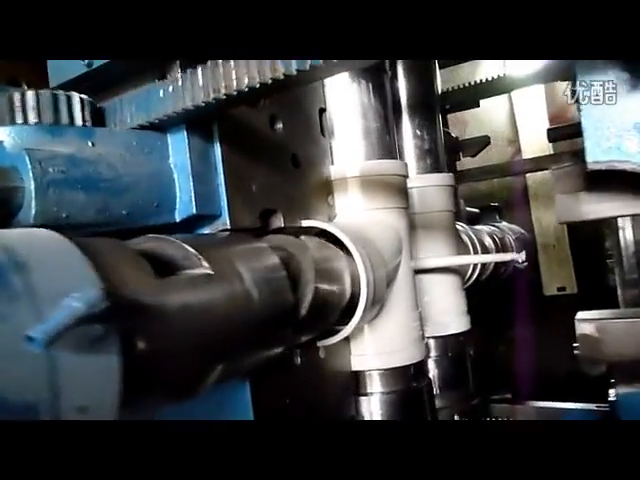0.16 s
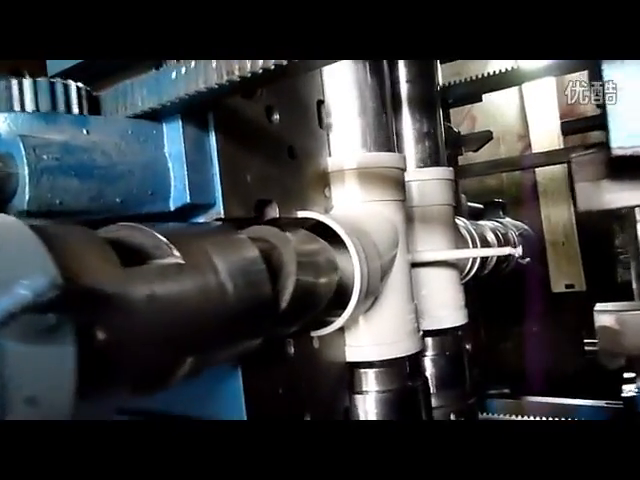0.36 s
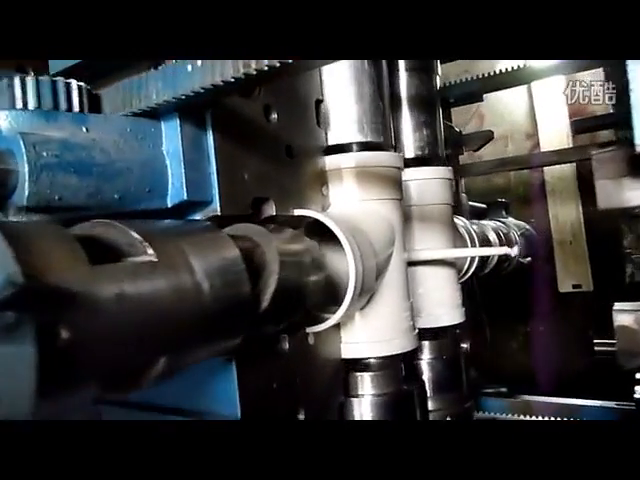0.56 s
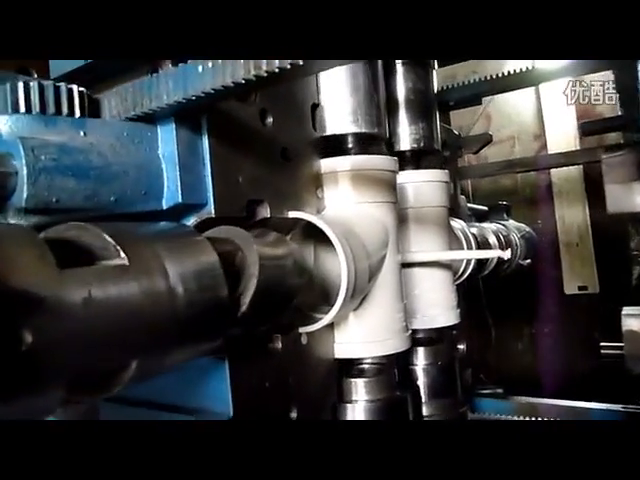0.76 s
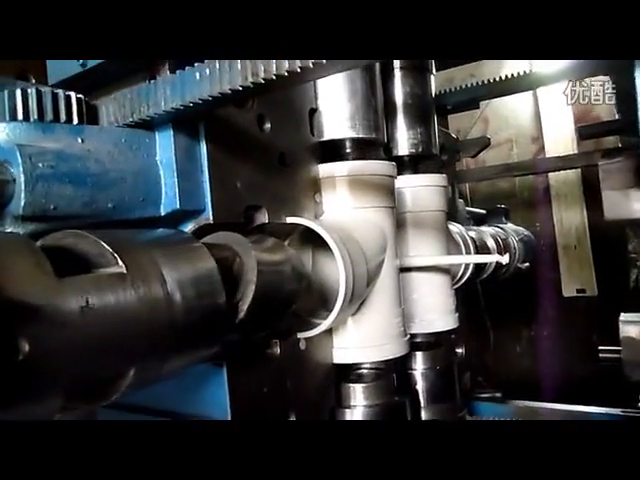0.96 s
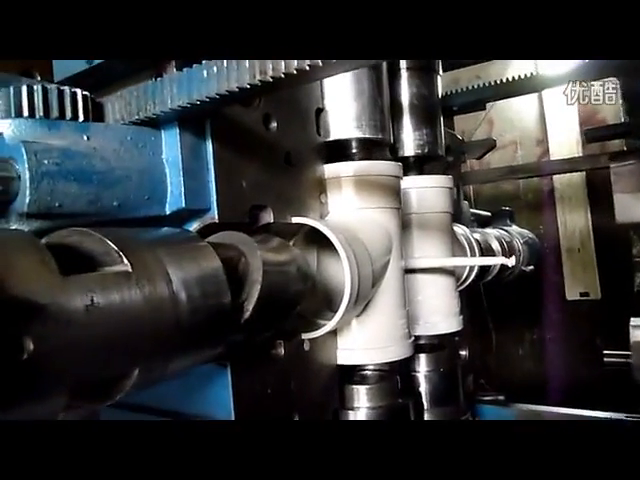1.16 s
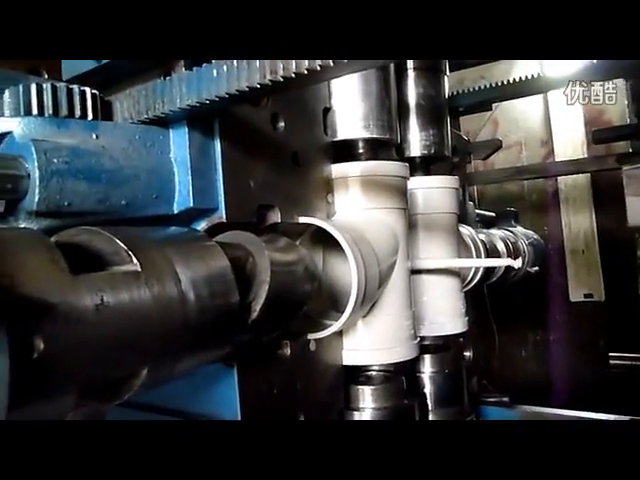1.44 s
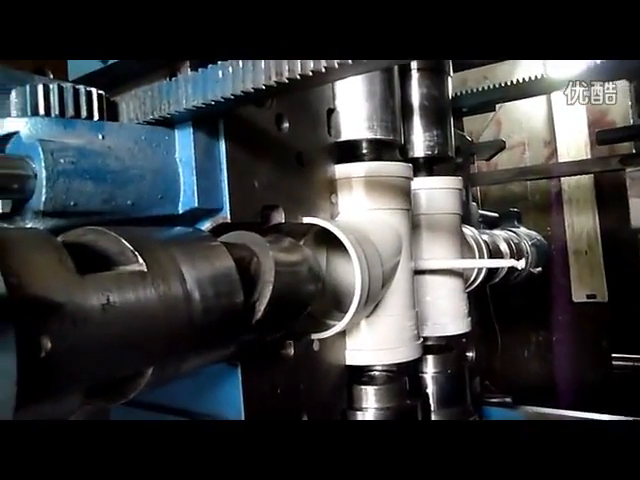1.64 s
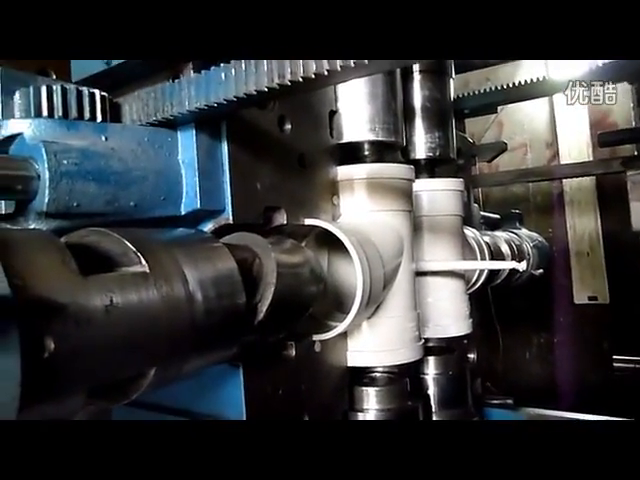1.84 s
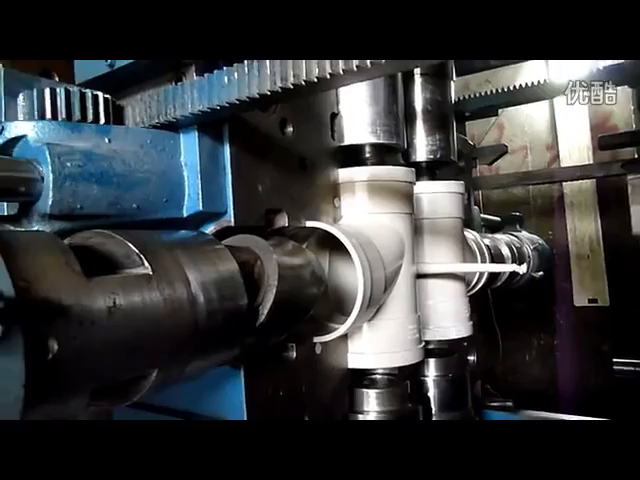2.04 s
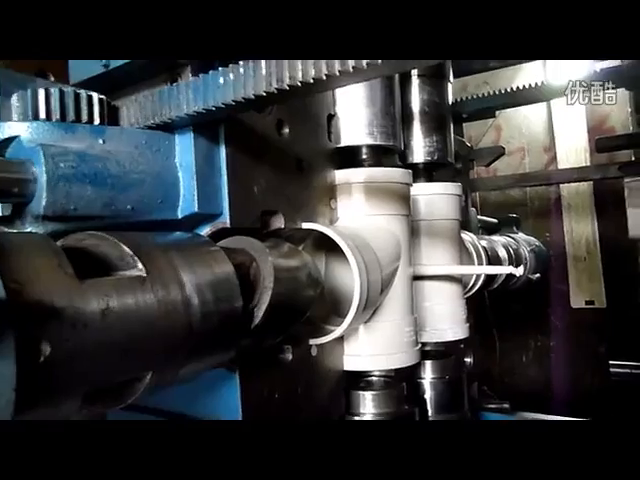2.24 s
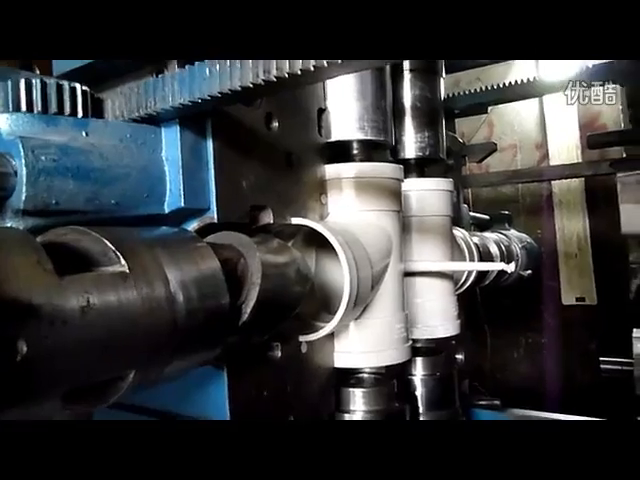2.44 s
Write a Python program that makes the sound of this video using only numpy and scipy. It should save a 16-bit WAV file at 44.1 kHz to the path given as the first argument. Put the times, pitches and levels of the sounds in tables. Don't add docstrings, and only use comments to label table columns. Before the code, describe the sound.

A moulding machine drones loudly and close in a busy factory hall, its steady pump whine near 300 Hz under bright oil hiss. At 0.84 s a hard steel clack cuts the hiss. From 1.0 s a slide rumbles with small knocks until about 1.6 s, while thin, whistling air hisses. At 2.1 s oil hiss surges back, with a sharp air spit at 2.3 s. Dense mono camera sound.

```python
import sys
import numpy as np
from scipy import signal
from scipy.fft import rfft, irfft
from scipy.io import wavfile
from scipy.ndimage import uniform_filter1d

SR = 44100
rng = np.random.default_rng(int(sys.argv[2]) if len(sys.argv) > 2 else 0)


def gain_from_db(level_db):
    decades = np.asarray(level_db, float) / 20
    return 10 ** decades


def to_wav(s):
    ch = np.atleast_2d(s).T
    pcm = np.round(np.clip(ch, -1, 1) * 32767)
    wavfile.write(sys.argv[1], SR, pcm.astype(np.int16))


N = 113778


def curve(rows):
    seconds, value = np.transpose(np.array(rows, float))
    return np.interp(np.arange(N) / SR, seconds, value)


def walk(rate_hz):
    hold = max(int(SR / rate_hz), 2)
    steps = np.repeat(rng.standard_normal(N // hold + 2), hold)
    wander = uniform_filter1d(uniform_filter1d(steps, hold), hold)[:N]
    return (wander - wander.mean()) / wander.std()


def roar(spectrum, swell_db, flick_db, flick_hz, body=()):
    hz, db = np.transpose(np.array(spectrum, float))
    f = np.fft.rfftfreq(N, 1 / SR) + 1
    level_db = np.interp(np.log(f), np.log(hz), db, left=-60)
    for peak_hz, width_hz, peak_db in body:
        level_db = level_db + peak_db / (1 + ((f - peak_hz) / width_hz * 2) ** 2)
    shaped = gain_from_db(level_db) * rfft(rng.standard_normal(N))
    noise, swell = 0, walk(3.03)
    for octave in np.arange(4.5, 14, 1 / 3):
        share = np.clip(1 - 3 * np.abs(np.log2(f) - octave), 0, 1)
        if (np.abs(shaped) * share).max() > np.abs(shaped).max() / 300:
            band = irfft(shaped * share, N)
            noise = noise + band * gain_from_db(swell_db * swell + flick_db * walk(flick_hz))
    return noise / noise.std()


def tone(phase, rms_db, walk_db, walk_hz):
    level = np.sqrt(2) * gain_from_db(rms_db + walk_db * walk(walk_hz))
    return level * np.sin(phase + 2 * np.pi * rng.random())


def lines(table, walk_db, walk_hz):
    t = np.arange(N) / SR
    return sum(tone(2 * np.pi * hz * t, db, walk_db, walk_hz) for hz, db in table)


def ring(start, hz, peak_db, t60):
    contact_s = 0.00041
    t = np.clip(np.arange(N) / SR - start, 0, None)
    envelope = gain_from_db(peak_db - 60 * t / t60) * (1 - np.exp(-t / contact_s))
    return envelope * np.sin(2 * np.pi * hz * t)


# rms level idle in dB, rms level loaded in dB.
VANE_HARMONICS = [(-30.5, -30.5), (-31.5, -31), (-46.5, -44.5), (-44, -46), (-44.5, -72), (-59, -52),
                  (-46, -47.5), (-44.5, -43), (-56, -49), (-60, -60), (-54, -58), (-67, -45),
                  (-40.5, -46.5), (-51, -47), (-51, -50), (-53.5, -51), (-48.5, -52), (-56, -60),
                  (-53, -43.5), (-47, -44.5), (-45, -49), (-55, -50), (-59, -45.5), (-47, -47), (-45, -50),
                  (-45, -47), (-61, -65), (-56, -62), (-46, -44), (-53, -58), (-54, -51), (-58, -48),
                  (-56, -49)]
# time in seconds, load as a share 0-1.
PUMP_LOAD = [
    (0, 0.98),
    (.86, 1),
    (.93, .4),
    (1.08, 0.01),
    (2.11, 0),
    (2.15, 0.95),
    (2.58, 1),
]


def vane_pump():
    idle_hz, slip_hz = 299.46, 1.06
    load = np.clip(curve(PUMP_LOAD), 0, 1)
    jitter = 1 + .00008 * walk(20)
    phase = 2 * np.pi * np.cumsum((idle_hz - slip_hz * load) * jitter) / SR
    whine = 0
    for k, (idle_db, loaded_db) in enumerate(VANE_HARMONICS, start=1):
        level_db = idle_db + (loaded_db - idle_db) * load
        whine = whine + tone(k * phase, level_db, 1.2, 5.01)
    return whine


# frequency in Hz, density in dB per Hz.
VALVE_SPECTRUM = [(1200, -35), (2000, 0), (3400, -4.5), (4500, 1.5), (5900, -4.5), (7500, -4), (9500, -1.5),
                  (12000, -18)]
# time in seconds, rms level in dB.
VALVE_FLOW = [(0, -28.5), (.3, -30), (.55, -28), (.7, -27.5), (.8, -25.5), (.845, -26.5), (.87, -32),
              (.95, -32.5), (1.02, -39), (1.42, -55), (1.5, -31), (1.56, -48), (2.1, -57), (2.115, -35),
              (2.14, -25.5), (2.33, -28), (2.5, -27.5), (2.58, -30)]
# frequency in Hz, width in Hz, gain in dB.
VALVE_RESONANCES = [(1770, 300, 12.5), (2320, 190, 1), (3840, 220, 7.5), (4500, 710, 3), (5870, 330, 8),
                    (6890, 270, 7), (8700, 440, 3), (11200, 500, 9)]


def oil_valve():
    return gain_from_db(curve(VALVE_FLOW)) * roar(VALVE_SPECTRUM, 0.54, 0.96, 8.7, VALVE_RESONANCES)


# start in seconds, peak level in dB, pitch factor, ring time factor.
IMPACTS = [(0.8382, -8, 0.99, 1.0), (.8445, -15, 1.36, 0.77), (.852, -16.5, .7, 1.3), (1.03, -22, 1, 1.2),
           (1.107, -18, 1.07, 0.79), (1.150, -16, 1.2, 0.69), (1.27, -23, 1.05, 1.1),
           (1.35, -16, 1.13, 0.72), (1.472, -16.5, 0.97, 0.83), (1.538, -27, 1.1, 1), (1.6, -20, 0.78, 1.2),
           (2.462, -20, 1.24, 0.73)]
# frequency in Hz, level in dB, t60 in seconds.
IMPACT_MODES = [(527, -2, 0.054), (812, 2.5, 0.037), (900, 3.5, 0.042), (1060, -1, 0.03),
                (1258, 1.5, 0.038), (1450, -5, 0.029), (2240, -18, 0.03)]


def clacks():
    hits = 0
    for start, peak_db, pitch, length in IMPACTS:
        for hz, mode_db, t60 in IMPACT_MODES:
            hits = hits - ring(start, hz * pitch, peak_db + mode_db - 8, t60 * length)
    return hits


# frequency in Hz, density in dB per Hz.
RACK_SPECTRUM = [(350, -16.5), (550, -2), (800, 3), (1050, 2), (1300, -9.5), (1600, -5), (2400, -24.5)]
# time in seconds, rms level in dB.
RACK_LEVEL = [
    (0, -51),
    (.99, -32.5),
    (1.03, -28.5),
    (1.2, -27.5),
    (1.35, -29),
    (1.65, -28),
    (1.85, -31),
    (2.1, -31),
    (2.2, -32.5),
]


def rack():
    return gain_from_db(curve(RACK_LEVEL)) * roar(RACK_SPECTRUM, 0.95, 1.5, 15.5)


# frequency in Hz, density in dB per Hz.
JET_SPECTRUM = [(6500, -15), (7800, -3), (8800, 0.5), (9300, 3), (10000, 4), (11200, 1), (12500, -10)]
# time in seconds, rms level in dB.
JET_PRESSURE = [(0, -36), (.8, -31.5), (.88, -49), (1.0, -55), (1.1, -36), (1.2, -44), (1.27, -29),
                (1.42, -29.5), (1.5, -28.5), (1.75, -27.5), (2.05, -30), (2.17, -28.5), (2.32, -26.5),
                (2.45, -29), (2.58, -29)]
# frequency in Hz, width in Hz, gain in dB.
NOZZLE_RESONANCES = [(7750, 300, 4), (9310, 170, 6.5), (9900, 230, 3), (11360, 250, 2), (11400, 250, 4.5)]
# frequency in Hz, rms level in dB.
JET_WHISTLES = [(9195, -41), (9480, -48), (11472.5, -41), (6363, -54), (7887, -49), (1410, -46),
                (9550, -47), (9674, -49), (9927, -49), (8990, -46), (8791, -51), (7590, -51), (7660, -52),
                (7063, -54), (6961, -54), (4371, -55), (10874, -50)]
# start in seconds, level in dB, t60 in seconds.
AIR_SPITS = [(0.416, -37, .25), (.76, -36, .2), (1.155, -36, .1), (1.468, -34, 0.23), (1.76, -38, .15),
             (2.075, -29, .1), (2.305, -23, .3), (2.475, -39, .1)]
# frequency in Hz, density in dB per Hz.
SPIT_SPECTRUM = [(2500, -20), (8000, -15), (10000, -2), (11500, 14), (13000, -4)]


def air_jet():
    t = np.arange(N) / SR
    hiss = gain_from_db(curve(JET_PRESSURE)) * roar(JET_SPECTRUM, 0.3, 1.6, 16, NOZZLE_RESONANCES)
    spits = 0
    for start, db, t60 in AIR_SPITS:
        spits = spits + (t > start) * gain_from_db(db - 60 * np.clip(t - start, 0, None) / t60)
    whistle = np.interp(t, [1.0, 1.3, 1.7, 2.1, 2.16], [0, .9, 0.81, .8, 0.096])
    return hiss + spits * roar(SPIT_SPECTRUM, 0, 1.5, 41) + whistle * lines(JET_WHISTLES, 1.4, 5.2)


# start in seconds, frequency in Hz, peak level in dB, t60 in seconds.
FAR_RINGS = [
    (.29, 1130, -27, 0.45),
    (.864, 140, -18, 0.25),
    (0.92, 110, -23, .1),
    (1, 235, -15, 0.06),
    (0.75, 125, -23, 0.36),
    (1.498, 560, -18.5, 0.19),
    (1.46, 640, -27, 0.1),
    (1.9, 620, -22, 0.11),
    (1.4, 575, -25.5, 0.24),
    (1.15, 590, -18, 0.073),
]


def far_rings():
    return sum(ring(*row) for row in FAR_RINGS)


# frequency in Hz, rms level in dB.
SHAFT_ORDERS = [(49.8, -44.5), (74.7, -45), (99.7, -40), (149.5, -40.5), (199.3, -35), (224.3, -32),
                (249, -42.5), (398.6, -47.5), (870, -46.5), (921, -50)]


def neighbour_pumps():
    return lines(SHAFT_ORDERS, 2, 5.02)


# frequency in Hz, rms level in
# dB.
DRIVE_TONES = [(1211, -45), (1614, -46), (2186, -44), (6864, -52), (8177, -45), (9765, -43), (9972, -45),
               (9610, -51), (6565, -52)]


def drives():
    return lines(DRIVE_TONES, 1.9, 4.06)


# frequency in Hz, density in dB per Hz.
HALL_SPECTRUM = [(30, -27), (55, -9.5), (210, 2), (420, -7.5), (1100, -10), (2500, -16), (5200, -23.5),
                 (9500, -14)]


def hall():
    return gain_from_db(-23) * roar(HALL_SPECTRUM, 0.44, 0.89, 6.08)


def scene():
    machine = vane_pump() + oil_valve() + clacks() + rack() + air_jet()
    background = far_rings() + neighbour_pumps() + drives() + hall()
    x = machine + background
    return np.array([x, x])


# frequency in Hz, width in Hz, narrow width in Hz, remainder in dB.
HOUSING_NOTCHES = [(3013, 1010, 250, -50), (5210, 470, 60, -30), (10540, 1000, 240, -20)]


def housing(x):
    for hz, wide_hz, narrow_hz, left_db in HOUSING_NOTCHES:
        cut = signal.lfilter(*signal.iirnotch(hz, hz / wide_hz, SR), x)
        band = [hz - narrow_hz / 2, hz + narrow_hz / 2]
        cut = signal.sosfilt(signal.butter(2, band, 'bandstop', fs=SR, output='sos'), cut)
        x = cut + gain_from_db(left_db) * (x - cut)
    return x


def fold(x):
    fold_hz = 12000
    f = np.fft.rfftfreq(N, 1 / SR)
    roll_off = gain_from_db(-9.5 * np.clip(f - 10320, 0, None) / 1000)
    s = rfft(x) * roll_off * (f < fold_hz)
    k = int(fold_hz * N / SR) + 1
    image = np.zeros_like(s)
    image[:, k:2 * k] = np.conj(s[:, k - 1::-1])[:, :len(f) - k]
    image_level = gain_from_db(-2.5 - 17.5 * (f - fold_hz) / 1000)
    edge = 1 + (f / 13700) ** 200
    return irfft(s + image * image_level / edge, N)


def thin_out(x):
    f, t, s = signal.stft(x, SR, nperseg=2048)
    power = uniform_filter1d(np.abs(s) ** 2, size=5, axis=-2)
    local = np.sqrt(uniform_filter1d(power, size=3, axis=-1))
    limit = gain_from_db(-73 + 5 * np.interp(t * SR, np.arange(N), walk(5)))
    outside = (f < 2500) | (f > 5600)
    keep = (local > limit) | outside[:, None]
    return signal.istft(s * keep, SR, nperseg=2048)[1][:, :N]


def low_pass(x):
    return signal.sosfilt(signal.butter(12, 13280, fs=SR, output="sos"), x)


# time in seconds, gain in dB.
CAMERA_GAIN = [
    (0, -1.5),
    (.025, 0.5),
    (.85, 0),
    (.88, -1),
    (.93, -0.5),
    (.97, -2),
    (1.02, -.5),
    (1.1, 0),
    (1.4, 0.5),
    (2.58, 0),
]


def record(dry):
    x = housing(dry * gain_from_db(curve(CAMERA_GAIN)))
    mix = thin_out(fold(x))
    return low_pass(mix)


dry = scene()
out = record(dry)
to_wav(out)
```